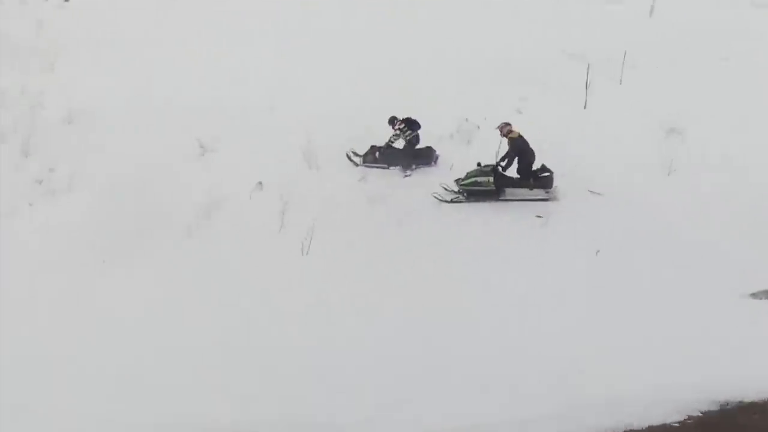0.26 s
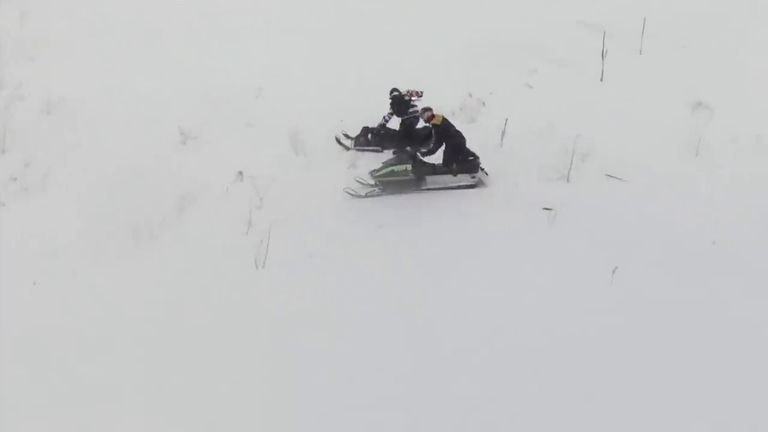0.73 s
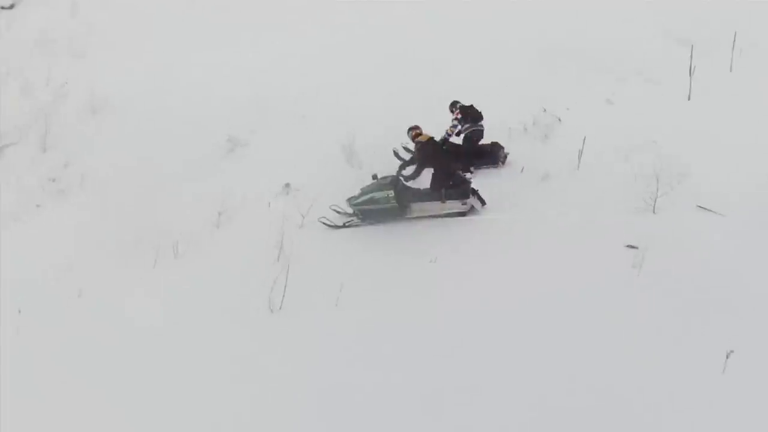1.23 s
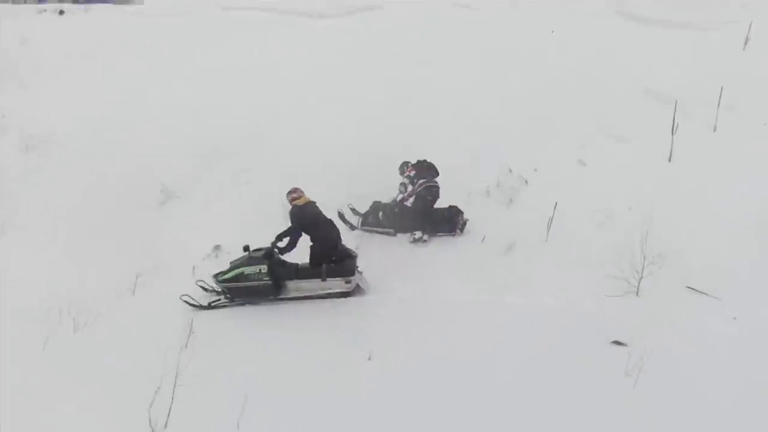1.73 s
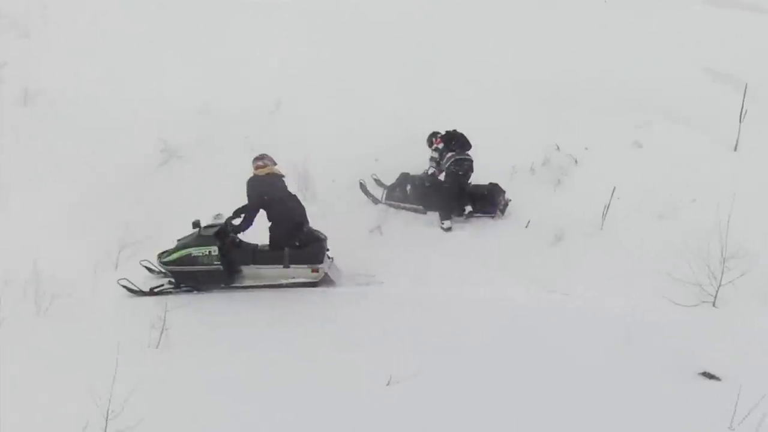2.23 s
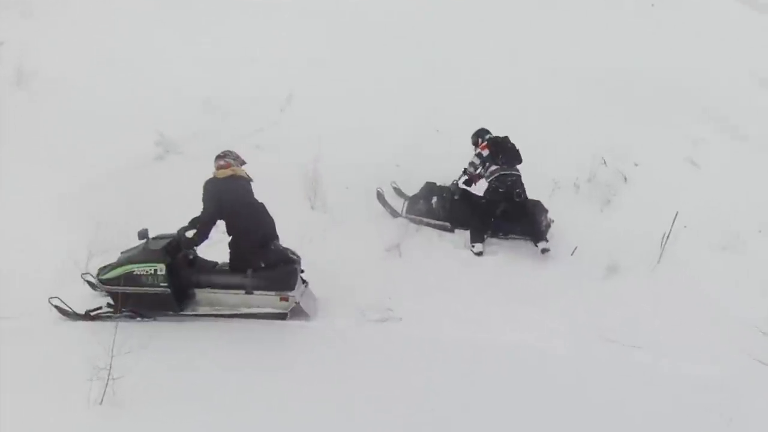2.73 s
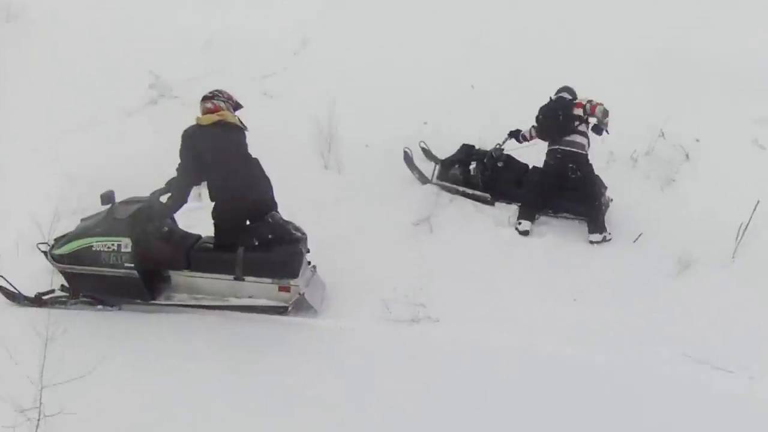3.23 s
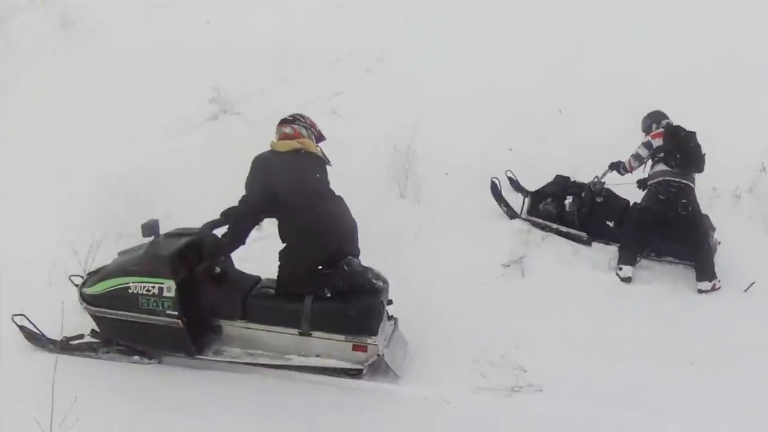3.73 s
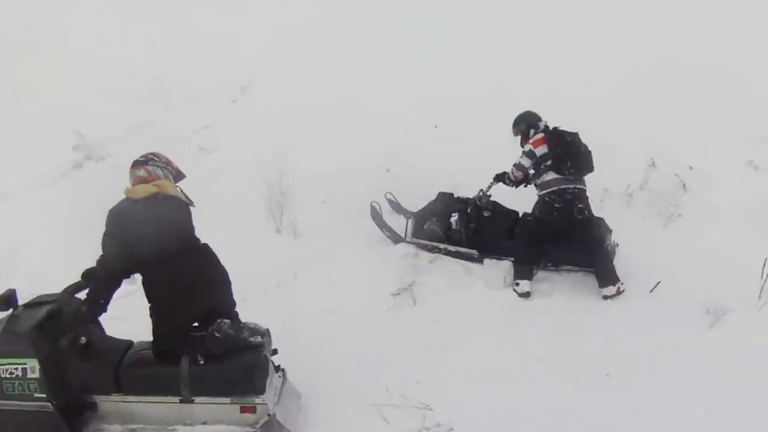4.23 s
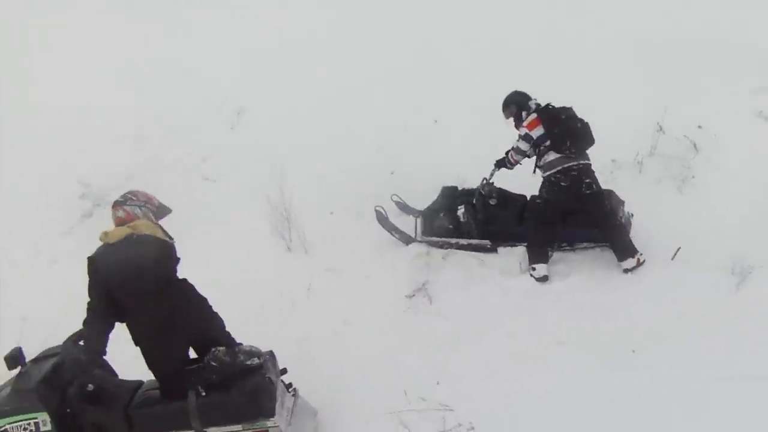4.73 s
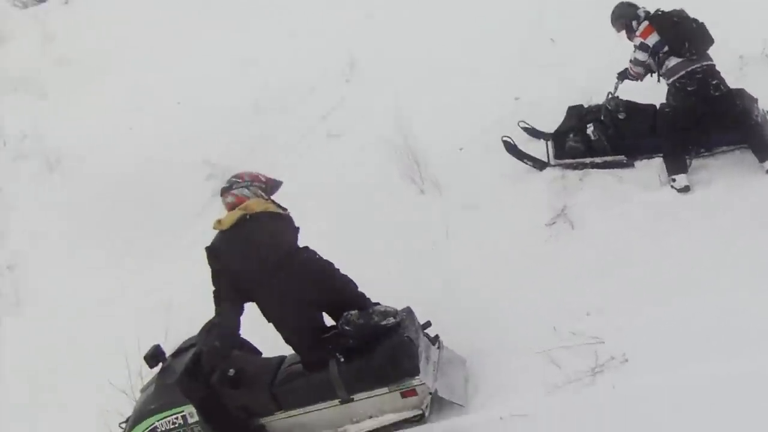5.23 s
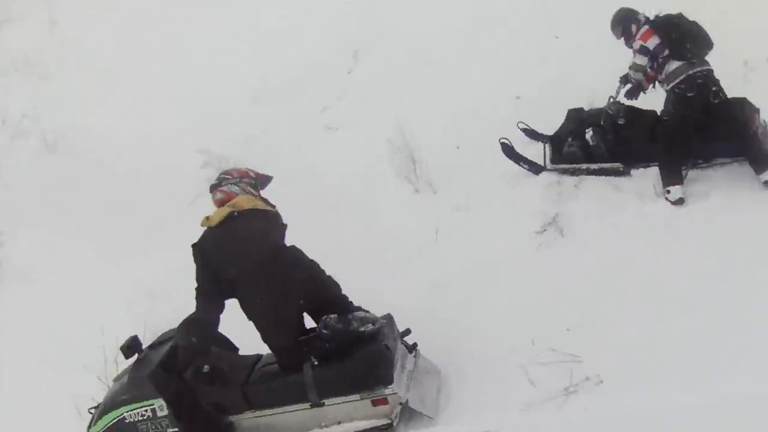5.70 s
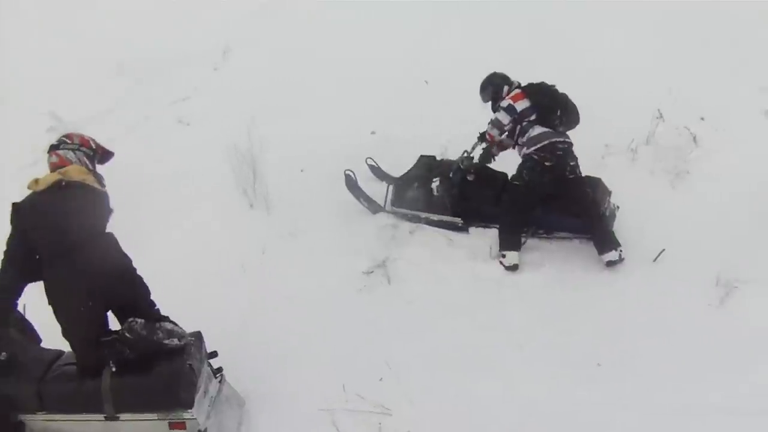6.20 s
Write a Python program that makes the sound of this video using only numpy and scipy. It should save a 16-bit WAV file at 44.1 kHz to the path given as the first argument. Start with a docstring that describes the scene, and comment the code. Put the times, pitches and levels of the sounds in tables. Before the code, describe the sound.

An old two-stroke snowmobile is running from the start, drawing up to a single microphone on open snow, with no echo. The throttle is blipped three times in quick succession, at about 0.3, 0.6 and 1 second, each a short buzzing rise in pitch with sputtering between. The engine sags into uneven popping, then revs a fourth time at about 2 seconds. From 2.5 seconds it settles into a lumpy idle that gradually slows and drops in pitch, with irregular pops ringing the pipe and silencer over a low hum. The pops are strongest around 3 to 4 seconds, then turn a little softer and hollower as the exhaust faces away. Exhaust rasp, light metal rattle, mechanical hiss and low rumble lie underneath throughout. A very faint, thin squeal sets in just before the end, at about 6.5 seconds, with the engine still idling.

```python
"""Two-stroke snow vehicle, pulling up

Open snow, one microphone. A small machine rolls up close, blipping its throttle four times, then settles to
a lumpy idle, pipe turned away. The pumping crank hums in its low overtones; with the throttle shut only
some turns fire, as pops that ring the pipe and silencer. Gas rasp, rattle, mechanical hiss and rumble lie
underneath, and a faint squeal sets in at the end."""
import sys
import numpy as np
from scipy import signal
from scipy.fft import rfft, irfft, next_fast_len
from scipy.io import wavfile
from scipy.ndimage import uniform_filter1d

SR = 44100
rng = np.random.default_rng(int(sys.argv[2]) if len(sys.argv) > 2 else 0)


def waveform_to_disk(signal):
    """Save audio, clipped to [-1, 1], as 16-bit WAV at the path in sys.argv[1]."""
    frames = np.transpose(np.atleast_2d(signal))
    scaled = np.clip(frames, -1, 1) * 32767
    samples = np.round(scaled).astype(np.int16)
    wavfile.write(sys.argv[1], SR, samples)


N = 284886
TIME = np.arange(N) / SR

# Table levels are relative: each source sets its overall gain.
# how the machine stands to the microphone: t/s, nearness (0 far and side-on, 1 close and turned away)
STANCE = [(0, 0.2), (1.3, 0.037), (3, 0.11), (4.2, 0.18), (4.8, 0.67), (5.2, 0.77), (6.46, 0.82)]
# turning rate of the crank: t/s, f/Hz
CRANK_SPEED = [(0, 135), (.16, 114), (.25, 109), (.46, 135.5), (.59, 127), (.75, 143.6), (.94, 120.8),
               (1.14, 142), (1.27, 126.7), (1.35, 115), (1.49, 103), (1.64, 97.2), (1.98, 91.6),
               (2.17, 126), (2.37, 112.3), (2.52, 105), (3, 93), (4.05, 83.4), (4.75, 78.3), (6, 76.3),
               (6.46, 71.5)]
# throttle blips: opens t/s, shuts t/s, opening (0-1)
BLIPS = [(0.281, 0.424, 0.68), (0.582, 0.766, 0.4), (0.943, 1.149, 0.6), (1.995, 2.151, 0.67)]
# overtones of the hum: multiple of the crank speed, level/dB
OVERTONES = [(1, -12.5), (2, 4), (3, 2.5), (4, 1.5), (5, -3.5), (6, -13.5), (7, -16.5), (8, -8.5),
             (9, -5.5), (10, -1), (11, 0.5), (12, -3), (13, 0), (14, 1.5), (15, 3)]
# how the pipe passes the hum: f/Hz, throttle shut level/dB, throttle open level/dB
HUM_RESPONSE = [(102, -51.5, -54.5), (155, -27.5, -35.5), (166, -35, -49.5), (217.3, -51, -50.5),
                (228, -33.5, -34), (260, -29.5, -30.5), (286, -40, -25), (400, -37, -19.5),
                (442, -30.5, -23), (480, -47, -22), (540, -40, -29.5), (603, -52, -48.5), (675, -46.5, -39),
                (730, -57, -44.5), (780, -60, -45.5), (880, -65.5, -51), (1010, -56, -38.5),
                (1050, -62.5, -41), (1170, -66.5, -50), (1420, -75.5, -60.5)]
# strength of the hum: t/s, overtones 2 and 4 level/dB, 1 and 3 level/dB, 5 and up level/dB
PUMPING = [(0, 2, -32, 4), (.22, -3.5, -7, -2.5), (.38, 2, -22.5, 6.5), (.64, 1, -10, 5),
           (.86, 1.5, -12.5, 1.5), (1.25, -1, -8, -1.5), (1.5, 0, 1.5, 6), (1.9, -2.5, 3.5, 5),
           (2.3, -3.5, -9.5, -3), (2.55, -23, 4.5, 6), (2.9, -1.5, 6, 9), (3.6, -3.5, -1, -12),
           (4.3, -10.5, -4, 2.5), (4.9, -13, -5, -5.5), (5.9, -11, -6, -11.5), (6.46, -6.5, 1.5, -4)]
# the firing stumbles for a turn or two: t/s
STUMBLES = [.343, .5, .562, .665, .79, 1.055, 1.165]
# noise of fan, intake and drive: f/Hz, level/dB
HISS_SPECTRUM = [(700, 3.5), (1200, 2), (1700, -5), (2300, -25), (3000, -35), (4300, -31), (4800, -39),
                 (5300, -33.5), (5800, -51.5), (7400, -39), (9800, -46.5), (12000, -63), (14500, -81)]
# noise of track and hull: f/Hz, level/dB
RUMBLE_SPECTRUM = [(20, -42), (50, -29), (85, -19), (115, -8), (145, -4), (195, -11), (260, -5), (420, -6),
                   (540, -15), (680, -33), (2000, -70), (6000, -110)]
# the deep part of that noise: f/Hz, level/dB
DEEP_SPECTRUM = [(20, 0), (95, 0), (125, -30), (6000, -90)]
# course of the rumble: t/s, level/dB, gain on its deep part/dB
RUMBLE_LEVEL = [(0, -31.5, -8), (.8, -35.5, -3.5), (1.7, -33.5, -0.5), (2.3, -34.5, -2), (3.5, -34.5, 0.5),
                (4.6, -33, -1), (6.46, -31.5, 0.5)]
# every turn with the throttle shut: t/s, weak burn level/dB, crack level/dB, clatter level/dB
SHUT_TURNS = [(0, -16.5, -28.5, -67.5), (.85, -29, -28.5, -68), (1.497, -36, -31, -70),
              (2.298, -16.5, -28, -77), (2.899, -26, -28.5, -65.5), (3.6, -50, -27.5, -66.5),
              (4.199, -16.5, -42, -69.5), (4.899, -23, -44.5, -74.5), (5.5, -57, -42, -65.5),
              (6.46, -41.5, -35, -73)]
# lone firings: t/s, thump level/dB, crack level/dB
POPS = [(0.0543, -12.5, -21.5), (0.1361, -8, -28), (0.145, -12, -19.5), (0.2066, -6.5, -38),
        (0.2155, -7.5, -21.5), (0.2427, -11, -24.5), (0.2702, -9, -22.5), (0.3062, -15.5, -22.5),
        (0.323, -20, -32), (0.3559, -16, -29.5), (0.4631, -5, -26.5), (0.516, -9, -26.5),
        (0.5422, -6.5, -27), (0.577, -10.5, -32), (0.6002, -10, -27), (0.6685, -11.5, -31.5),
        (0.8039, -5.5, -23.5), (0.8872, -12.5, -32.5), (0.935, -6, -23), (0.9605, -9.5, -21.5),
        (1.1849, -7, -32), (1.2545, -4.5, -22), (1.3736, -7, -21.5), (1.383, -9.5, -37), (1.438, -4, -26),
        (1.4474, -37.5, -26), (1.4661, -7, -23.5), (1.5148, -21, -46), (1.5247, -8, -58),
        (1.5444, -6.5, -48.5), (1.5543, -6, -29), (1.6047, -3, -23.5), (1.6152, -5.5, -42.5),
        (1.6563, -7.5, -45.5), (1.6771, -4.5, -33.5), (1.6872, -5.5, -24), (1.6977, -4, -32.5),
        (1.7607, -2, -23), (1.771, -0.5, -19.5), (1.7812, -2.5, -27), (1.7907, -28, -28.5),
        (1.8554, -0.5, -18.5), (1.8881, -4.5, -33), (1.9095, -4.5, -26), (1.9198, -5, -27.5),
        (1.9631, -3, -19), (1.9738, -9.5, -30.5), (1.9833, -11, -23), (2.1765, -12.5, -27),
        (2.2173, -18, -37), (2.2342, -7, -32.5), (2.3186, -6, -28.5), (2.3807, -5, -36.5),
        (2.4076, -3.5, -27), (2.4628, -9, -33.5), (2.491, -9, -25.5), (2.5193, -17.5, -22.5),
        (2.5677, -3.5, -52.5), (2.587, -10.5, -39), (2.5966, -13, -20), (2.6755, -2.5, -22),
        (2.6858, -6, -34), (2.7463, -4.5, -20.5), (2.7564, -5, -32), (2.8389, -2, -20), (2.8492, -2, -23.5),
        (2.9223, -1.5, -20), (2.9329, -2, -31), (2.986, -4, -27), (2.9969, 0, -41), (3.0293, -6, -30),
        (3.04, 0, -33), (3.0507, -6, -27), (3.127, -2.5, -18.5), (3.1378, -3.5, -49), (3.2257, -2, -20.5),
        (3.2811, 1, -20), (3.3367, -1, -21.5), (3.4154, 1, -18.5), (3.4266, -6, -23.5), (3.5165, -4, -33),
        (3.539, -7.5, -30), (3.5507, -6.5, -52), (3.6187, -2, -19), (3.6306, -6.5, -47.5),
        (3.6531, -3.5, -29), (3.7337, -1, -23.5), (3.7683, -4, -21.5), (3.8267, -0.5, -26),
        (3.8854, -3.5, -21.5), (3.9212, -9, -43.5), (3.9447, -2, -19.5), (4.0038, -1.5, -21.5),
        (4.0667, -7, -31.5), (4.0877, -3.5, -20), (4.0997, -9, -33.5), (4.1481, -8, -46),
        (4.1725, -12, -35), (4.2089, -13, -20), (4.221, -17.5, -59), (4.2454, -13, -31),
        (4.3308, -8.5, -28), (4.3431, -10.5, -58), (4.4049, -8, -35.5), (4.442, -6.5, -29.5),
        (4.5043, -5, -24.5), (4.5418, -7, -25.5), (4.6049, -5.5, -22), (4.6688, -7.5, -23.5),
        (4.7327, -6.5, -22), (4.7455, -22.5, -40), (4.7965, -6.5, -23.5), (4.8865, -6, -20),
        (4.9508, -5.5, -27.5), (5.0155, -8, -25), (5.0541, -8, -28), (5.1443, -7.5, -26),
        (5.1832, -8, -28.5), (5.2491, -8.5, -44.5), (5.3159, -7, -25), (5.329, -27.5, -31),
        (5.4464, -8.5, -27), (5.4856, -7.5, -35.5), (5.4985, -22, -34.5), (5.5775, -7, -27.5),
        (5.6166, -13.5, -36.5), (5.6425, -10, -34), (5.7346, -6, -25.5), (5.7736, -7.5, -28),
        (5.8911, -7, -29), (5.9302, -5.5, -27), (6.0219, -16, -39), (6.0482, -10.5, -27), (6.0615, -6, -37),
        (6.1415, -6.5, -29.5), (6.1819, -7, -25.5), (6.2502, -7.5, -24), (6.3192, -9.5, -55),
        (6.3471, -12.5, -61), (6.389, -9, -23), (6.4306, -6, -27.5)]
# exhaust pipe modes: f/Hz, t60/s, far level/dB, near level/dB
PIPE_MODES = [(266, 0.087, -6, -5), (328.2, 0.082, -4.5, -6), (364, 0.026, -23.5, -15),
              (417.6, 0.082, -5.5, 7), (511, 0.069, -9, -25.5), (564.5, 0.12, -9.5, -2.5)]
# silencer shell modes: f/Hz, t60/s, far level/dB, near level/dB
SHELL_MODES = [(775, 0.21, -15.5, -17.5), (844, 0.066, -25.5, 7.5), (939.6, 0.27, -11.5, -13.5),
               (968, 0.036, 0, -13.5), (1130, 0.029, -9, -18), (1172.5, 0.3, -15.5, -9.5),
               (1350, 0.034, -6, -10), (1458, 0.058, -14, -13), (1924, 0.056, -9.5, -26.5)]
# jet turbulence: f/Hz, level/dB
JET_SPECTRUM = [(300, -15), (600, 5), (850, -10.5), (1000, 12), (1500, -13), (2000, -19.5), (2400, -33),
                (3000, -45.5), (4200, -56), (5600, -57), (6500, -56.5), (10500, -55.5), (12500, -63),
                (14500, -72)]
# modes of the thin cowl and fins: f/Hz, t60/s, far level/dB, near level/dB
COWL_MODES = [(2655, 0.013, 2.5, -0.5), (2950, 0.0028, 5.5, -1.5), (3470, 0.003, 1.5, -5),
              (4020, 0.009, -3, -5.5), (4300, 0.016, -9, -2.5), (5270, 0.0074, -12, -9),
              (6430, 0.0036, -8, -11), (7060, 0.0019, -9.5, 1.5), (9840, 0.0018, -7, -4)]
# hard firings make the cowl clank: t/s, level/dB
CLANKS = [(0.0523, -57), (0.133, -54), (0.2123, -52), (0.2404, -58), (0.268, -52), (0.3037, -56),
          (0.3537, -58), (0.4618, -56), (0.5354, -52), (0.575, -57.5), (0.598, -58), (0.6305, -56.5),
          (0.8021, -73), (0.933, -58), (0.9587, -56), (1.2521, -67), (1.3708, -71), (1.4366, -68),
          (1.853, -63), (2.174, -59.5), (2.5172, -65), (2.595, -59), (2.673, -54), (2.7442, -62),
          (2.836, -68), (3.1235, -78), (3.2241, -64), (3.4131, -60.5), (3.651, -63.5), (3.8835, -62),
          (3.9419, -77), (4.604, -67), (4.731, -61), (4.8847, -67), (5.0524, -81), (5.182, -67),
          (5.4449, -65), (5.4823, -64), (5.575, -57), (5.7723, -61), (5.889, -66), (5.9283, -65),
          (6.18, -60), (6.2461, -61), (6.4273, -65)]


def from_db(db):
    """Level in dB to gain."""
    return 10 ** (np.asarray(db) / 20)


def read_curves(rows, at):
    """The later columns of a table, interpolated along its first."""
    axis, *columns = np.transpose(rows)
    return [np.interp(at, axis, column) for column in columns]


def band(x, low_hz, high_hz, order):
    """Butterworth band-pass."""
    return signal.sosfilt(signal.butter(order, [low_hz, high_hz], "band", fs=SR, output="sos"), x)


def clicks(times, height):
    """A train of single-sample pushes."""
    out = np.full(N, 1e-18)
    np.add.at(out, np.clip(np.round(times * SR).astype(int), 0, N - 1), height)
    return out


def ring(x, hz, t60):
    """A unit push sets a sine of height 1 ringing."""
    r, w = from_db(-60 / (t60 * SR)), 2 * np.pi * hz / SR
    return signal.lfilter([0, np.sin(w)], [1, -2 * r * np.cos(w), r * r], x)


def strike(push, modes, near):
    """Every push rings all modes, each as loud as the machine's stance lets it reach the microphone."""
    return sum(ring(push * from_db(far_db + near * (near_db - far_db)), hz, t60)
               for hz, t60, far_db, near_db in modes)


def decay(x, seconds):
    """Each push jumps up and dies away exponentially."""
    return signal.lfilter([1], [1, -np.exp(-1 / (seconds * SR))], x)


def coloured(x, spectrum):
    """Noise given a spectrum; unit white noise comes out at rms 1."""
    size = next_fast_len(N + SR // 10)
    hz, level_db = np.transpose(spectrum)
    gain = from_db(np.interp(np.log(np.fft.rfftfreq(size, 1 / SR) + 1), np.log(hz), level_db))
    return irfft(rfft(x, size) * gain / np.sqrt(np.mean(gain ** 2)), size)[:N]


def throttle(times, open_s=.0061, shut_s=.012):
    """Throttle opening, 0-1, with a quick ramp at each end of a blip."""
    opens, shuts, opening = np.transpose(BLIPS)[:, :, None]
    ramps = np.minimum((times - opens) / open_s + .5, (shuts - times) / shut_s + .5)
    return (opening * np.clip(ramps, 0, 1)).sum(axis=0)


def unevenness(opening):
    """Share of the turn-to-turn scatter that remains: an open throttle runs more evenly."""
    return 1 - .35 * np.clip(opening / .6, 0, 1)


def per_turn(angle, spread_db):
    """A gain that wanders at random from one turn to the next."""
    count = int(angle[-1]) + 2
    return from_db(spread_db * np.interp(angle, np.arange(count), rng.standard_normal(count)))


def crank_angle(speed, off_beat_turns=.15):
    """Crank angle in turns; a whole number of turns lies between two firings, stray pops aside."""
    angle = np.cumsum(speed) / SR
    fired, whole = [0], [0]
    for at in np.interp(np.array(POPS)[:, 0], TIME, angle):
        turns = at - fired[-1]
        if len(fired) == 1 or abs(turns - round(turns)) < off_beat_turns * (1 + turns / 10):
            fired.append(at)
            whole.append(whole[-1] + round(turns))
    slip = np.interp(angle, fired[1:], np.subtract(whole, fired)[1:])
    # the flywheel evens the crank over about four turns
    return angle + uniform_filter1d(slip, size=4 * SR // 90, mode="nearest")


def crank_hum(angle, speed, stumble_db=-10, stumble_s=.012):
    """The pumping crank hums at multiples of its speed; all but the lowest two dip at a stumble."""
    opening = throttle(TIME)
    uneven = unevenness(opening)
    pumping_db = read_curves(PUMPING, TIME)
    dip_db = stumble_db * np.exp(-((TIME - np.array(STUMBLES)[:, None]) / stumble_s) ** 2).sum(axis=0)
    hum = 0
    for multiple, own_db in OVERTONES:
        hz = multiple * speed
        shut_db, open_db = read_curves(HUM_RESPONSE, hz)
        pipe_db = shut_db + opening * (open_db - shut_db)
        flow_db = pumping_db[2 if multiple > 4 else multiple % 2]
        lead = .6 * np.arctan((300 - hz) / 30)  # overtones below the pipe's resonance crest early
        jitter = uneven * np.log(per_turn(angle, .9))
        gain = from_db(own_db + pipe_db + flow_db + dip_db * (multiple > 2))
        gain *= per_turn(angle, 1.7) ** uneven
        hum += gain * np.cos(2 * np.pi * multiple * angle + lead + jitter)
    return np.sqrt(2) * signal.sosfiltfilt(signal.butter(3, 120, "high", fs=SR, output="sos"), hum)


def machine_hiss(angle, speed, near, swell_at_s=5.52, swell_width_s=.1, swell_db=3.5):
    """Fan, intake and drive hiss, shaken by loose parts from turn to turn; the level swells once."""
    swell = from_db(swell_db * np.exp(-((TIME - swell_at_s) / swell_width_s) ** 2))
    noise = band(rng.standard_normal(N), 500, 16000, order=3) * per_turn(angle, 2.0) * swell
    lows = signal.sosfiltfilt(signal.butter(2, 1500, fs=SR, output="sos"), noise)
    noise -= (1 - from_db(-9 * near)) * lows  # turned away, the hull shades the low end
    return from_db(-48 + 1.5 * near) * (speed / 90) ** .38 * coloured(noise, HISS_SPECTRUM)


def track_rumble():
    """Track and hull rumble throughout; the part below about 100 Hz rises and falls on its own."""
    level_db, deep_db = read_curves(RUMBLE_LEVEL, TIME)
    rumble = coloured(rng.standard_normal(N), RUMBLE_SPECTRUM)
    deep = coloured(rumble, DEEP_SPECTRUM)
    deep *= np.dot(deep, rumble) / np.dot(deep, deep)  # as strong as it is within the rumble
    return from_db(level_db) * (rumble + (from_db(deep_db) - 1) * deep)


def firings(angle, thump_lead_s=.004296, crack_lead_s=.00255):
    """Pushes from weak burns on every turn and lone pops: first a thump, then a crack, then clatter."""
    turn_s = np.interp(np.arange(0, angle[-1]), angle, TIME)
    opening = throttle(turn_s)
    open_db = np.array([[-20.5], [-20.5], [-58.5]])  # burn, crack and clatter at full throttle
    shut_db = np.array(read_curves(SHUT_TURNS, turn_s))
    scatter_db = (rng.standard_normal((len(turn_s), 3)) * [5, 1.6, 3]).T * unevenness(opening)
    burn_db, turn_crack_db, clatter_db = shut_db + opening * (open_db - shut_db) + scatter_db
    pop_s, thump_db, pop_crack_db = np.transpose(POPS)
    thump = clicks(turn_s - thump_lead_s, from_db(burn_db))
    thump += clicks(pop_s - thump_lead_s, from_db(thump_db))
    turn_crack = clicks(turn_s - crack_lead_s, from_db(turn_crack_db))
    pop_crack = clicks(pop_s - crack_lead_s, from_db(pop_crack_db))
    return thump, turn_crack, pop_crack, clicks(turn_s, from_db(clatter_db))


def hull_echo(thump, near, delay_s=.0026):
    """With the pipe turned away, each thump also reaches the microphone off the hull."""
    share = .8 * near
    return (thump + share * np.roll(thump, round(delay_s * SR))) / (1 + share / 2)


def exhaust_pipe(thump, near):
    """Each push of gas leaves the tail pipe as a short blast and sets the pipe ringing."""
    blast = ring(thump, hz=359.5, t60=.042) * from_db(-4 - 9 * near)
    # the port opens gradually and the silencer takes off the sharp edge
    return from_db(-15) * band(blast + strike(thump, PIPE_MODES, near), 208.2, 515.6, order=4)


def hull_boom(thump, near):
    """The hull booms at each thump, a little more from close by."""
    return from_db(-28 + 2.5 * near) * band(ring(thump, hz=140.8, t60=.12), 105, 190, order=2)


def silencer_shell(turn_crack, pop_crack, near, soften_s=.000092):
    """Every crack rings the shell; those of the steady turns also pass as a short broad knock."""
    softened = decay(pop_crack, soften_s) / (soften_s * SR / 2)
    ringing = strike(softened + turn_crack, SHELL_MODES, near)
    knock = .058 * ring(turn_crack, hz=760, t60=.0065)
    return from_db(-16.5) * band(ringing + knock, 620, 1660, order=4)


def gas_rasp(turn_crack, pop_crack, near, pop_gust_s=.008, turn_gust_s=.009, rise_s=.0005):
    """A turbulent jet follows each crack: the gas speed rises quickly and falls more slowly."""
    turn_push = .3 * turn_crack * from_db(-7 * throttle(TIME))  # steady open-throttle flow rasps less
    gust = decay(pop_crack, pop_gust_s) + decay(turn_push, turn_gust_s)
    gust = decay(gust, rise_s) / (rise_s * SR)
    jet = coloured(gust * rng.standard_normal(N), JET_SPECTRUM) * from_db(-10 - 4.5 * near)
    return jet + .9 * (1 - near) ** 2 * band(jet, 1800, 12000, order=2)  # brighter side-on


def cowl_rattle(clatter, pop_crack, near, shake_s=.0087):
    """Turns and pops shake the thin metal of cowl and fins; hard firings make it clank."""
    clank_s, clank_db = np.transpose(CLANKS)
    knocks = clatter + from_db(-42.5) * pop_crack + clicks(clank_s, from_db(clank_db))
    shaking = decay(knocks, shake_s) * rng.standard_normal(N)
    return from_db(-28.5) * band(strike(shaking, COWL_MODES, near), 2100, 12000, order=3)


def pop_snap(pop_crack, near):
    """The sharp front of each pop, softer with the pipe turned away."""
    return from_db(-11 - 3 * near) * band(ring(pop_crack, hz=1060, t60=.011), 930, 1900, order=3)


def squeal(start_s=6.25, rise_s=.05, hz=3510, t60=.03, level_db=-81):
    """A thin squeal of narrow noise that fades in and stays."""
    tone = ring(ring(rng.standard_normal(N), hz, t60), hz, t60)
    return from_db(level_db) * tone / tone.std() * np.clip((TIME - start_s) / rise_s, 0, 1)


def scene():
    """The machine in the open, drawing up to the microphone; soft snow sends nothing back."""
    speed = read_curves(CRANK_SPEED, TIME)[0]
    near = read_curves(STANCE, TIME)[0]
    angle = crank_angle(speed)
    thump, turn_crack, pop_crack, clatter = firings(angle)
    thump = hull_echo(thump, near)
    thuds = exhaust_pipe(thump, near) + hull_boom(thump, near)
    cracks = silencer_shell(turn_crack, pop_crack, near) + pop_snap(pop_crack, near)
    grit = gas_rasp(turn_crack, pop_crack, near) + cowl_rattle(clatter, pop_crack, near)
    drone = crank_hum(angle, speed) + machine_hiss(angle, speed, near) + track_rumble()
    return (drone - thuds - cracks + grit + squeal())[None]


def record(dry):
    """One channel with the top treble cut off; the last moment fades."""
    cutoff_hz, fade_s = 14200, .004
    out = signal.sosfilt(signal.cheby2(12, 40, cutoff_hz, fs=SR, output="sos"), dry)
    return out * np.clip(TIME[::-1] / fade_s, 0, 1)


dry = scene()
out = record(dry)
waveform_to_disk(out)
```